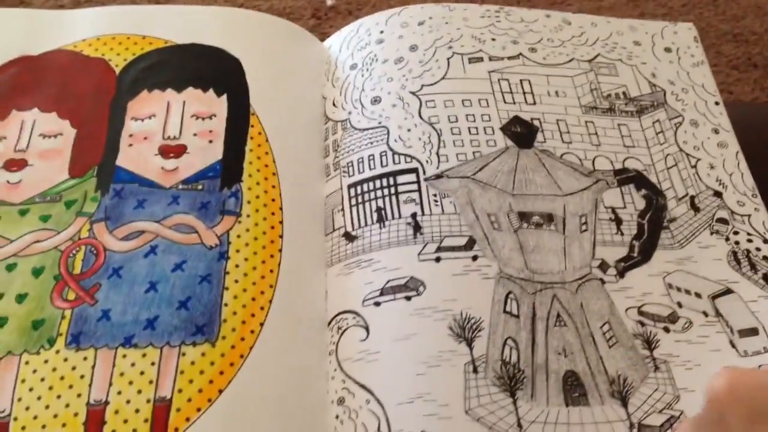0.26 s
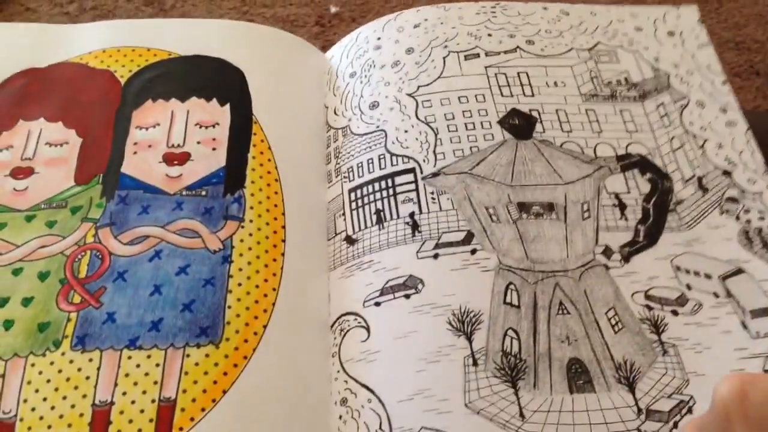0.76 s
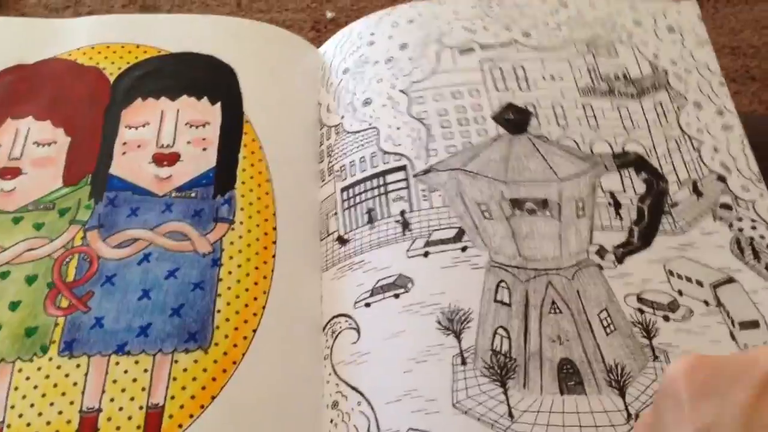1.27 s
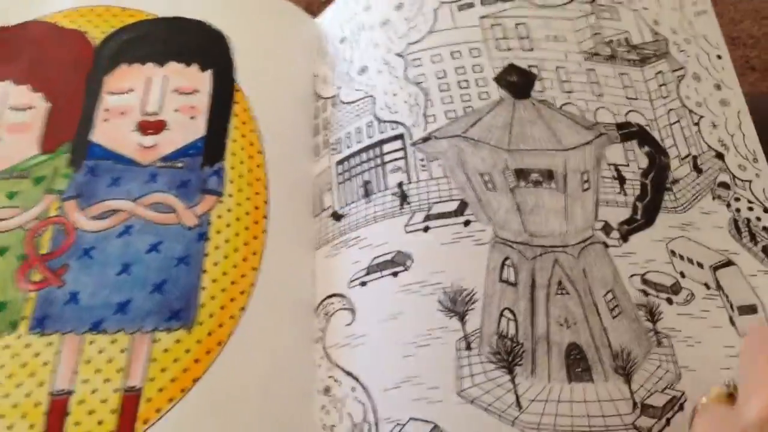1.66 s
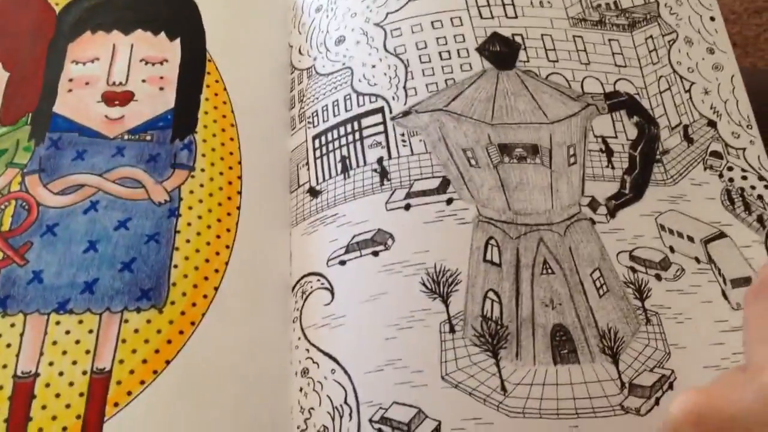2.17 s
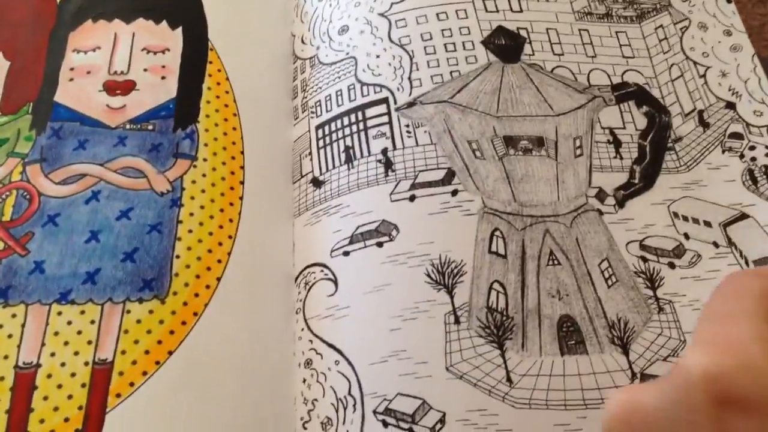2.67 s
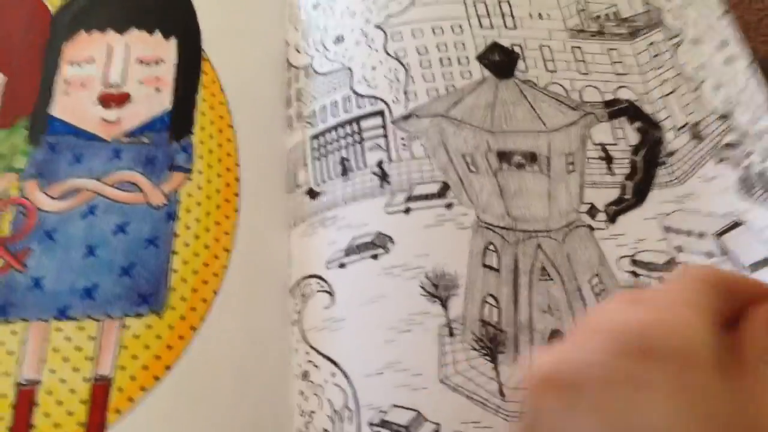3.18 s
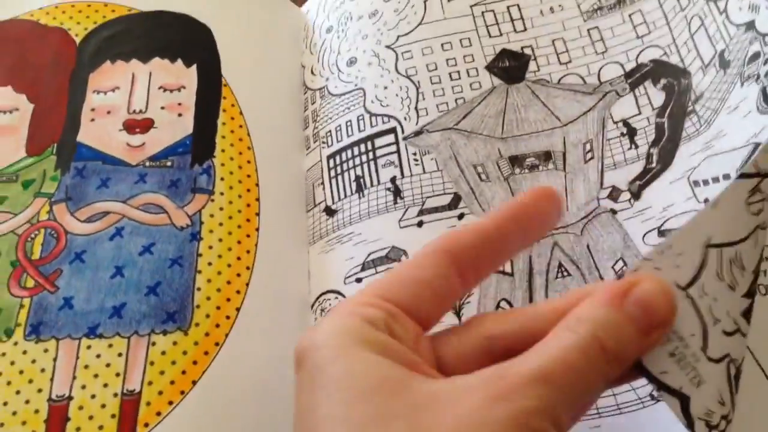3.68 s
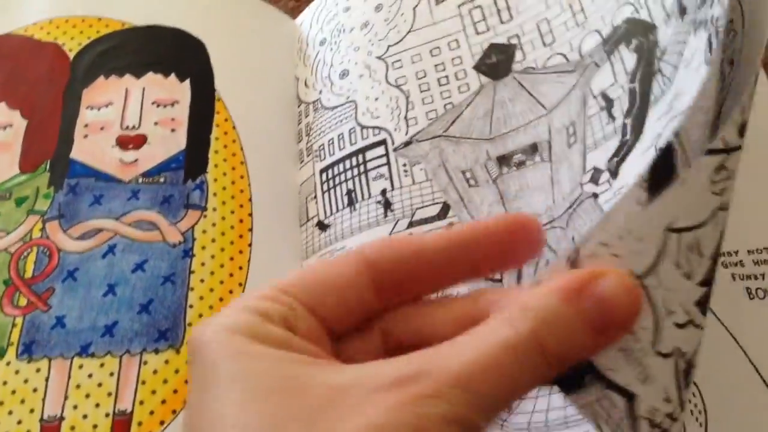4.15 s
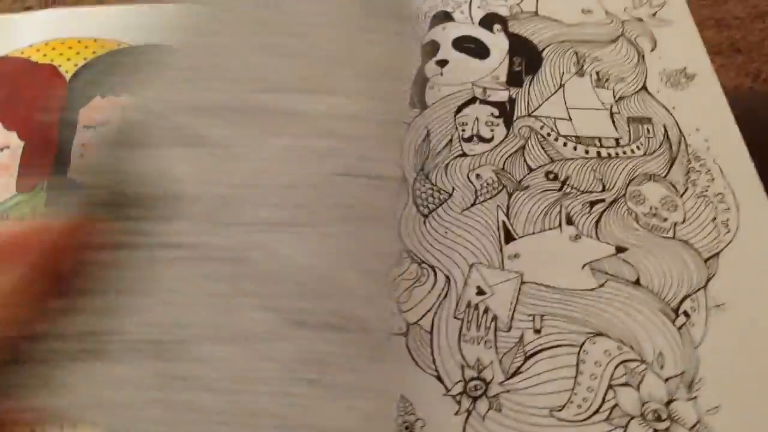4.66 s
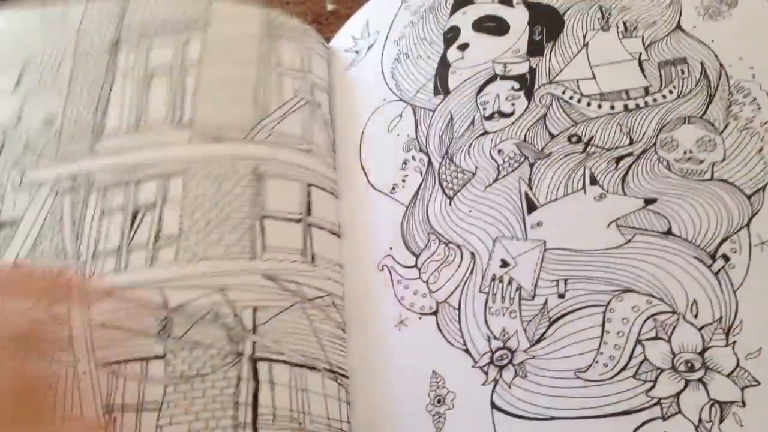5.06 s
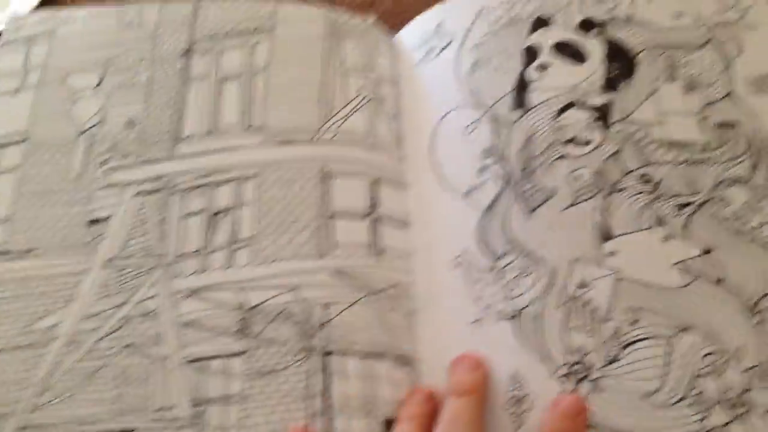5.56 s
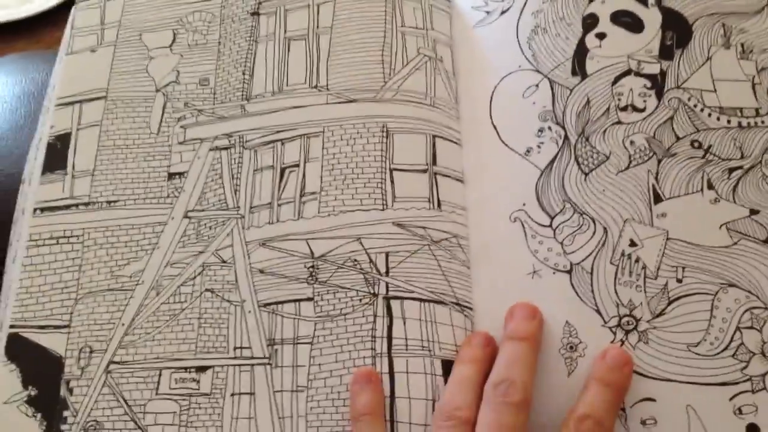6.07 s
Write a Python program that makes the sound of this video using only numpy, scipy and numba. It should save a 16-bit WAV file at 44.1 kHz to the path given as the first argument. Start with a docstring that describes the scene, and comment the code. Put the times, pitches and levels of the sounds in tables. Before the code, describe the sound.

Paper crackles in a dense cluster at first, crisp and dry with small soft thuds, then thins to sparse ticks and paired snaps. Later the fingers pinch and lift a page, giving solid pops, and it turns with a bright, grainy rustle and fluttering flick. Faint skin-on-paper brushing and soft bumps follow. Close, dry indoor pickup with slight room reflection and quiet hiss.

```python
"""A soft, grainy rustle and a quick run of dry snaps: a hand holds a picture book open in a quiet room,
picks up the corner of a page, turns it past the fingers and smooths it down.
Each snap is a sharp pulse that rings the bent sheets, sprays after-slips and lands with a soft thud.
Skin sliding on paper is a dense stream of noise grains with a ringing curl; short noise bursts are the flicks.
Below lie the book's low murmur on the table, a faint room reply, steady hiss and wavering tones."""
import sys
import numpy as np
from scipy import signal
from scipy.fft import rfft, irfft, next_fast_len
from scipy.io import wavfile
from numba import njit

SR = 44100
rng = np.random.default_rng(int(sys.argv[2]) if len(sys.argv) > 2 else 0)


def file_out(sig):
    """Save sig as 16-bit WAV at sys.argv[1]."""
    # one column per channel
    cols = np.atleast_2d(sig).T
    # limit, then scale
    lim = np.clip(cols, -1, 1)
    pcm = np.round(lim * 32767).astype(np.int16)
    wavfile.write(sys.argv[1], SR, pcm)


N = 279153
TIME = np.arange(N) / SR

# snaps of the paper: time_s, strength_db (before colouring), bend (name), crispness_db,
# after_slip_share (of the energy, 0-1)
PAPER_SNAPS = [(.2234, -23, "slack", -4, 0.3), (.2477, -18.5, "slack", -2, 0.33),
               (.2747, -12, "slack", -6.5, 0.02), (.301, -7.5, "slack", -11.5, 0),
               (.3318, -3.5, "slack", -8, 0.18), (.3666, -3, "slack", -1.5, 0.03),
               (.4176, -1.5, "slack", -3.5, 0.08), (.5156, 3, "slack", -4.5, 0.09),
               (.5962, -13.5, "pinched", -10, 0.3), (.6267, 3.5, "slack", -3, 0.11),
               (.719, -21.5, "pinched", -2, .2), (.7463, 4, "bowed", -2, 0.11),
               (.7915, 1, "taut", -0.5, 0.17), (.8528, -1, "bowed", -2, 0.05), (.8826, -5, "taut", 2, 0.06),
               (.9139, -7, "bowed", 1, 0.43), (1.017, -13, "taut", -3.5, 0.1),
               (1.032, -23.5, "taut", 3, 0.4), (1.057, -29, "taut", 7, 0.5),
               (1.188, -31.5, "corner", 0, 0.05), (1.2076, -24.5, "slack", 3, 0.3),
               (1.2175, -23.5, "taut", -3, 0.77), (1.418, -21, "corner", -4, 0.22),
               (1.8609, -34.5, "edge", 13, .4), (1.9157, -28, "taut", 6, 0.47),
               (2.0047, -13.5, "taut", 3, .04), (2.0331, -13, "taut", 2, 0.03),
               (2.0602, -14, "bowed", 3, 0.3), (2.2512, -24.5, "curled", 9, 0.78),
               (2.26, -29, "curled", 4, 0.1), (2.3551, -15, "curled", 0, .5),
               (2.3607, -14, "curled", -3, 0.77), (2.3929, -10, "curled", 2.5, 0.28),
               (2.4594, -12, "curled", 5, .24), (2.4685, -17.5, "curled", 2, 0.6),
               (2.6205, -16, "curled", 8.5, .1), (2.6245, -11.5, "curled", 1, 0.5),
               (2.7335, -13.5, "pinched", -3, 0.5), (2.7402, -11.5, "pinched", -5.5, 0.8),
               (2.8442, 1.5, "folded", -2, 0.15), (3.104, -28, "curled", 1, 0.96),
               (3.1577, -33, "edge", 8, 0.5), (3.1777, -9, "taut", 3, 0.22),
               (3.557, -28, "pinched", -15, 0.3), (3.6114, -14.5, "pinched", -8.5, 0.92),
               (3.6446, -23.5, "corner", -2, 0.6), (3.7012, -14, "pinched", -9, 0.44),
               (3.7069, -8.5, "pinched", -12, 0.96), (3.7832, 5, "corner", -4.5, 0.21),
               (3.8791, -5.5, "corner", -4, 0.38), (3.9683, -5, "corner", -11.5, 0.7),
               (4.1346, -17, "edge", 5, 0.5), (4.1719, -7, "edge", 3.5, 0.76), (4.19, -8.5, "edge", 0, 0.6),
               (4.2223, -18, "edge", -2, .5), (4.2744, -4.5, "flapping", -6.5, 0.2),
               (4.315, -11, "flapping", -24, .4), (4.345, -13, "flapping", -0.5, 0.97),
               (4.3747, -11, "flapping", 3, 0.15), (4.399, -6, "flapping", -2, 0.65),
               (4.4818, -22, "flapping", 5, .4), (5.146, -35, "edge", 6, 0.1),
               (5.1635, -23.5, "pinched", -1.5, 0.54), (5.3518, -33, "edge", 1, 0),
               (5.3717, -26.5, "slack", -9, 0.96), (5.6751, -27.5, "slack", -1.5, 0.63)]
# ways the paper is bent when it lets go, by name: thump_db and fizz_db (for a snap of 0 dB strength),
# lowest_hz (lowest note of the patch), ring_hz (its strongest ring), landing_db (against the snap)
PAPER_BENDS = {"slack": (-5, -22, 550, 2750, -27), "bowed": (-2.5, -20, 976, 2777, -33.5),
               "taut": (-5.5, -18.5, 1080, 1420, -27.5), "curled": (-15, -22.5, 1238, 3853, -34),
               "pinched": (-11.5, -26, 1378, 1454, -39), "corner": (-12, -19.5, 726, 1700, -43),
               "edge": (-17, -15, 760, 3076, -34), "flapping": (-5, -17.5, 687, 1424, -23.5),
               "folded": (-8, -22, 830, 1970, -44)}
# rings of the open sheets, each varied a little from snap to snap: pitch_hz, t60_s, level_db
SHEET_RINGS = [(222, 0.035, -13), (547, 0.045, -23), (900, 0.0035, -1), (1484, 0.0057, -2),
               (1850, 0.013, -9), (2900, 0.069, -27)]
# strokes of skin and paper sliding: start_s, length_s, level_db (relative), body_db (hollow),
# air_db (hiss), curl_hz (pitch of the curl at mid-stroke), curl_db; the last three dB are relative to the crisp band
RUB_STROKES = [(0.028, 0.17, -61, -14, 0.5, 3730, -11), (0.261, 0.051, -62, 1, -5, 3800, -18),
               (0.4, 0.018, -51.5, -1, -12, 4800, -15), (0.463, 0.05, -50, -3.5, -25, 3050, 4),
               (.55, 0.14, -63.5, 2.5, -12, 2730, 4), (0.742, 0.068, -58.5, 0, -14, 2750, 2),
               (0.864, 0.064, -58, -6, -16, 2750, 7), (1.01, 0.032, -60, -19, -6, 2900, -4),
               (1.495, 0.3, -65.5, -4, -9, 2810, -2), (1.619, 0.048, -53.5, -9, -8.5, 4020, -13),
               (1.743, 0.057, -59.5, -22, -1, 4700, -12), (1.844, 0.041, -55.5, -25, -6.5, 4770, 1),
               (1.92, .02, -57.5, -15, -5, 4400, -9), (2.015, 0.047, -57, -4, -9, 2830, -18),
               (3.136, 0.63, -66.5, -11, -16, 2750, 1), (3.185, 0.014, -46, -11.5, -5, 2720, -13),
               (3.269, 0.038, -56, -19, -6, 3740, -4), (3.405, 0.028, -56, -12, -3.5, 2800, -23),
               (3.487, 0.047, -62.5, -1, 6, 2610, -21), (3.591, 0.061, -58.5, -2, -5.5, 2510, -21),
               (3.72, 0.092, -59, -9, -11, 2500, -17), (3.804, .11, -59.5, -3, -10, 2500, -16),
               (4.104, 0.014, -43, -13.5, -10.5, 2900, -19), (4.194, 0.073, -41, -15.5, -8.5, 4330, -5),
               (4.281, 0.044, -47, -9, -7, 4200, -11), (4.416, 0.017, -46, -24, -7, 3600, -7),
               (4.451, 0.0056, -42.5, 0.5, -13, 3620, -4), (4.478, 0.056, -60, -22, -12, 3750, -5),
               (4.759, 0.14, -66.5, -1, -7, 3300, -9), (4.923, 0.1, -60.5, -8.5, -6, 4040, -3),
               (5.027, 0.12, -61.5, -6.5, -3, 4300, -25), (5.354, 0.042, -67, -12, 2, 4020, -15),
               (6.082, 0.018, -61, -10, -0.5, 4000, -11)]
# colour of the rubbing: frequency_hz, level_db (per Hz, relative)
RUB_COLOUR = [(150, 3), (400, 3), (800, 7.5), (1500, 4.5), (2200, 2.5), (2750, 3), (3200, 2), (4200, 3.5),
              (5500, -2.5), (8000, -5), (11000, -8.5), (15000, -18)]
# brief flicks and bumps of the sheet: centre_s, length_s, level_db, centre_hz, width_hz
SHEET_FLICKS = [(0.04, 0.011, -53.5, 455, 660), (1.429, 0.016, -51, 3180, 4170),
                (1.4355, 0.0053, -48.5, 5440, 5600), (1.451, 0.004, -50.5, 2450, 4000),
                (1.4535, 0.012, -47, 320, 310), (3.187, 0.0085, -47, 8800, 2400),
                (4.08, 0.0044, -51, 3740, 2520), (4.141, .007, -53, 5500, 6000),
                (4.285, 0.011, -47.5, 1020, 1000), (4.305, 0.019, -50.5, 7200, 2000),
                (4.4418, 0.0041, -31, 3360, 806), (4.4422, 0.0072, -36.5, 4900, 3320),
                (4.523, 0.13, -67.5, 540, 398), (5.166, 0.013, -58.5, 11000, 6000),
                (5.679, 0.006, -55, 284, 332), (6.09, 0.035, -64, 860, 328)]
# the hands shift the book: centre_s, half_length_s, level_db (relative)
BOOK_SHIFTS = [(.32, .1, -75), (4.404, 0.13, -66), (5.766, .12, -65.5), (6.2, 0.3, -67.5)]
# colour of the book shifting on the table: frequency_hz, level_db (per Hz, relative)
BOOK_COLOUR = [(30, -16), (50, -18), (70, 4.5), (100, -3.5), (165, 0.5), (260, -1.5), (400, -14.5),
               (900, -42), (4000, -80)]
# colour of the room's reply: frequency_hz, level_db (per Hz, relative)
WALL_COLOUR = [(100, 4), (250, 1), (1000, -1), (3000, -2), (6000, 0.5), (14000, -9)]
# colour of the room's steady hush: frequency_hz, level_db (per Hz, relative)
HUSH_COLOUR = [(12, -48), (20, -12), (63, -4), (175, -6.5), (323, -12), (451, -9.5), (665, -11.5),
               (808, -12.5), (1010, -15.5), (1660, -16), (2900, -14), (3160, -13.5), (4660, -14),
               (5500, -15), (15400, -18.5)]
# faint tones in the room, each wavering by some Hz: mean_pitch_hz, level_db (rms)
ROOM_TONES = [(168, -78), (4443, -99), (4499, -97), (15000, -92)]

# the weaker a snap, the larger its share of thump and fizz: dB gained per dB of strength lost
THUMP_SLOPE, FIZZ_SLOPE = 0.41, 0.44
# a faint burst of noise leads into each snap; the level is for a snap made wholly of spray
LEAD_IN_S, LEAD_IN_DB = 0.0025, -9.5
# the freed patch lands on the sheet below; the pitch is scattered from one landing to the next
LANDING_DELAY_S, LANDING_HZ, LANDING_T60_S = 0.0128, 284, 0.028
# faint stray ticks in the strokes: rate, mean strength above the stroke's table level, spread
STRAYS_PER_S, STRAY_DB, STRAY_SPREAD_DB = 18, 16.5, 4.5
# each stroke swells and dies away exponentially (time constants), easing off and rising in pitch meanwhile
ATTACK_S, RELEASE_S, EASE_DB, CURL_RISE_OCTAVES = 0.016, 0.018, 1.5, 0.12
HOLD_DB = -71.5  # murmur of holding the book still, on the scale of the shifts
HUSH_DB = -66.5  # rms
TOP_HZ = 15450


def snaps():
    """Stick-slip of bent sheets: a faint burst of noise leads into each snap, and the patch then lands."""
    out = np.zeros(N)
    for time_s, strength_db, bend, crisp_db, slips in PAPER_SNAPS:
        # stronger in snaps with more spray
        lead_in = np.sqrt(slips) * release(strength_db + LEAD_IN_DB, bend, crisp_db, 1)
        add(out, time_s - LEAD_IN_S, lead_in)
        add(out, time_s - 0.0003, release(strength_db, bend, crisp_db, slips))
        landing_db = strength_db + PAPER_BENDS[bend][-1]
        add(out, time_s + LANDING_DELAY_S, landing(landing_db))
    return out


def release(strength_db, bend, crisp_db, slips):
    """A snap takes its colour from the bend of the paper and from its own strength."""
    thump_db, fizz_db, lowest_hz, ring_hz, _ = PAPER_BENDS[bend]
    thump_db = thump_db - THUMP_SLOPE * strength_db
    fizz_db = fizz_db - FIZZ_SLOPE * strength_db
    return snap(strength_db, thump_db, crisp_db, fizz_db, slips, lowest_hz, ring_hz)


def snap(strength_db, thump_db, crisp_db, fizz_db, slips, lowest_hz, ring_hz, size=2048):
    """The freed patch favours two pitches of its own and radiates little below the lower."""
    t = np.arange(size) / SR
    spray = unit(rng.standard_normal(size) * fade(t, 0.027) * (1 - fade(t, 0.0035)))
    motion = np.sqrt(1 - slips) * unit(blow(t)) + np.sqrt(slips) * spray
    low_ring = resonate(motion, np.full(size, 1. * lowest_hz), 230.0)
    high_ring = resonate(motion, np.full(size, 1. * ring_hz), 0.064 * ring_hz)
    motion = 0.88 * motion + 0.5 * low_ring + 1.07 * high_ring
    thump = [(30, thump_db - 14), (190, thump_db), (0.56 * lowest_hz, thump_db - 3.0)]
    middle = [(0.96 * lowest_hz, -2), (1850, -1.5)]
    crisp = [(2200, crisp_db / 2 - 2.0), (2600, crisp_db + 0.5), (3900, crisp_db - 0.5)]
    fizz = [(5600, fizz_db + 6.5), (9000, fizz_db - 3.0), (15000, fizz_db - 14.5)]
    tone = pulse(thump + middle + crisp + fizz)
    return undb(strength_db) * disperse(signal.fftconvolve(motion, tone))


def blow(t):
    """A sharp pulse rings the sheets, then bending waves return from the edges of the page."""
    ring = np.zeros(len(t))
    for hz, t60, mode_db in SHEET_RINGS:
        detune, gain = rng.standard_normal(2)
        mode = unit(np.cos(2 * np.pi * hz * (1 + 0.015 * detune) * t) * fade(t, t60))
        ring += mode * undb(mode_db + 2 * gain)
    out = 0.19 * ring
    out[0] += 1
    returns = unit(rng.standard_normal(len(t)) * fade(t, 0.013) * (t > 0.0005))
    return out + 0.48 * returns


def disperse(x, corner_hz=2600, count=5):
    """In a thin sheet low notes travel slower than high ones, which spreads the pulse (all-pass chain)."""
    g = np.tan(np.pi * corner_hz / SR)
    a = (g - 1) / (g + 1)
    return signal.sosfilt([[a, 1, 0, 1, a, 0]] * count, x)


def landing(db, scatter=0.19, cushion_s=0.005, size=2048):
    """Paper falls on paper with a decaying sine, its onset cushioned by the air between."""
    t = np.arange(size) / SR
    hz = LANDING_HZ * np.exp(scatter * rng.standard_normal())
    thud = np.sin(2 * np.pi * hz * t) * fade(t, LANDING_T60_S) * (1 - fade(t, cushion_s))
    return undb(db) * unit(thud)


def strays():
    """Here and there in the strokes the edge of the sheet catches faintly."""
    out = np.zeros(N)
    for start_s, length_s, level_db, *_ in RUB_STROKES:
        for _ in range(int(round(length_s * STRAYS_PER_S))):
            strength_db = level_db + STRAY_DB + STRAY_SPREAD_DB * rng.standard_normal()
            tick = release(strength_db, "corner", crisp_db=3.0, slips=0.34)
            add(out, start_s + length_s * rng.random(), tick)
    return out


def rustle(grains_per_s=2200, grain_db=3.0, smooth=0.94, flutter_db=2.0, curl_width_hz=420, bounce=0.38):
    """Fibres catch and let go in uneven grains; the sheet's curl rings and the hand's pressure flutters."""
    slide_db, body_db, air_db, curl_hz, curl_db = curves(sliding())
    sizes = undb(grain_db * np.minimum(rng.exponential(size=N), 4))
    grains = (rng.random(N) < grains_per_s / SR) * sizes * rng.choice([-1, 1], N)
    rub = level(grains, 0) + smooth * rng.standard_normal(N)
    # the facing page mirrors the sound over a gap that keeps changing
    lag_s = 0.000784 * np.exp(0.337 * walk(9))
    mirrored = np.interp(TIME - lag_s, TIME, rub)
    rub = colour(rub + bounce * mirrored, RUB_COLOUR)
    body = level(band(rub, 250, 1800), 0)
    crisp = level(band(rub, 1800, 5500), 0)
    air = level(band(rub, 5500, 16000), 0)
    curl = level(resonate(crisp, curl_hz * (1 + 0.017 * walk(32)), 1. * curl_width_hz), 0)
    # a stronger ring gives way in overall level
    crisp = (crisp + undb(curl_db) * curl) / (1 + 0.42 * undb(curl_db))
    pressure = undb(slide_db - 3.5 + flutter_db * walk(110))
    return pressure * (undb(body_db) * body + crisp + undb(air_db) * air)


def sliding(step_s=0.001):
    """Stroke curves, where the loudest overlap sets the colour and a tightening curl rises in pitch.

    Columns: time_s, level_db, body_db, air_db, curl_hz, curl_db."""
    t = np.arange(0, N / SR, step_s)[:, None]
    start, length, level_db, body_db, air_db, curl_hz, curl_db = np.transpose(RUB_STROKES)
    progress = np.clip((t - start) / length, 0, 1)
    before = np.maximum(start - t, 0) / ATTACK_S
    after = np.maximum(t - start - length, 0) / RELEASE_S
    gain = undb(level_db - EASE_DB * progress) * np.exp(-before - after)
    power = gain ** 2 + np.finfo(float).eps
    total = power.sum(axis=1)
    pitch = curl_hz * 2 ** (CURL_RISE_OCTAVES * (progress - 0.5))
    colours = [(power * c).sum(axis=1) / total for c in (body_db, air_db, pitch, curl_db)]
    return np.column_stack([t, 10 * np.log10(total), *colours])


def flicks():
    """The sheet brushes past something: a short swell of vibration round one resonance."""
    out = np.zeros(N)
    t = np.arange(-2048, 2048) / SR
    for centre_s, length_s, level_db, hz, width_hz in SHEET_FLICKS:
        # band edges whose geometric mean is the centre
        lo_hz = np.hypot(hz, width_hz / 2) - width_hz / 2
        shiver = band(rng.standard_normal(len(t)), lo_hz, lo_hz + width_hz, order=2)
        shiver = unit(shiver * np.exp(-2 * np.abs(t) / length_s))
        add(out, centre_s + t[0], shiver * undb(level_db) * np.sqrt(length_s * SR))
    return out


def rumble(swell_db=3.5):
    """The hands shift the book and its weight murmurs on the table as low, swelling noise."""
    noise = level(colour(rng.standard_normal(N), BOOK_COLOUR), -1.3)
    power = undb(HOLD_DB) ** 2
    for centre_s, half_s, level_db in BOOK_SHIFTS:
        power = power + undb(level_db) ** 2 * np.exp(-((TIME - centre_s) / half_s) ** 2)
    return noise * np.sqrt(power) * undb(swell_db * walk(13))


def room(x, t60=0.31, wet_db=-17.0, first_s=0.0071, size=22050):
    """A small furnished room answers faintly with decaying, coloured noise after a short gap."""
    t = np.arange(size) / SR
    reply = unit(rng.standard_normal(size) * fade(t, t60) * (t > first_s))
    return x + undb(wet_db) * signal.fftconvolve(x, colour(reply, WALL_COLOUR))[:N]


def hush():
    """Steady hiss and low room noise with a few tones that waver by some Hz."""
    out = level(colour(rng.standard_normal(N), HUSH_COLOUR), HUSH_DB)
    for hz, level_db in ROOM_TONES:
        phase = 2 * np.pi * np.cumsum(hz + 4 * walk(25)) / SR
        out += undb(level_db) * np.sqrt(2) * np.sin(phase)
    return out


@njit
def resonate(x, hz, width_hz):
    """State-variable band-pass whose centre moves."""
    y, b, l = np.empty(len(x)), 0., 0.
    for i in range(len(x)):
        g, k = np.tan(np.pi * hz[i] / SR), width_hz / hz[i]
        v = (b + g * (x[i] - l)) / (1 + g * (g + k))
        b, l, y[i] = 2 * v - b, l + 2 * g * v, k * v
    return y


def band(x, lo_hz, hi_hz, order=3):
    """Butterworth band-pass filter."""
    return signal.sosfilt(signal.butter(order, [lo_hz, hi_hz], "band", fs=SR, output="sos"), x)


def gain_db(points, hz):
    """Read (Hz, dB) points on a log-frequency axis."""
    f, db = np.transpose(points)
    return np.interp(np.log(np.maximum(hz, 1)), np.log(f), db)


def colour(x, points):
    """Filter x with a (Hz, dB) spectrum."""
    n = next_fast_len(len(x))
    gain = undb(gain_db(points, np.fft.rfftfreq(n, 1 / SR)))
    return irfft(rfft(x, n) * gain, n)[:len(x)]


def pulse(points, size=1024):
    """The most compact causal pulse with a given spectrum (minimum phase, by folding the cepstrum)."""
    gain = undb(gain_db(points, np.fft.rfftfreq(size, 1 / SR)))
    cepstrum = irfft(np.log(gain))
    cepstrum[1:size // 2] *= 2
    cepstrum[size // 2 + 1:] = 0
    return irfft(np.exp(rfft(cepstrum)))


def walk(rate_hz):
    """Random wander: normally distributed points, rate_hz a second, joined by straight lines."""
    count = int(N / SR * rate_hz) + 2
    return np.interp(TIME * rate_hz, np.arange(count), rng.standard_normal(count))


def curves(table):
    """Join the rows of a table by straight lines in time."""
    s, *columns = np.transpose(table)
    return [np.interp(TIME, s, c) for c in columns]


def undb(db):
    """Decibels to gain."""
    return 10 ** (np.asarray(db) / 20)


def level(x, db):
    """Bring x to an rms level."""
    return x * undb(db) / np.sqrt(np.mean(x ** 2))


def unit(x):
    """Scale x to an energy of one."""
    return x / np.sqrt(np.sum(x ** 2))


def fade(t, t60):
    """Exponential decay by 60 dB in t60 seconds."""
    return np.exp(-np.log(1000) * t / t60)


def add(out, start_s, x):
    """Mix x into out from a given time, trimming what falls outside."""
    i = int(round(start_s * SR))
    x, i = x[max(0, -i):], max(0, i)
    out[i:i + len(x)] += x[:len(out) - i]


def scene():
    """The book close by, in its room."""
    paper = snaps() + flicks() + rustle() + strays()
    return (room(paper) + rumble() + hush())[None]


def record(dry):
    """A steep elliptic low-pass cuts the top of the treble."""
    return signal.sosfilt(signal.ellip(10, 0.1, 60, TOP_HZ, fs=SR, output="sos"), dry)


dry = scene()
out = record(dry)
file_out(out)
```